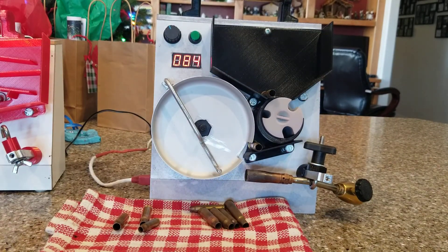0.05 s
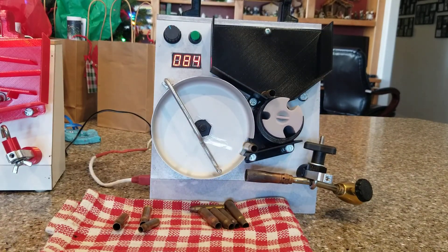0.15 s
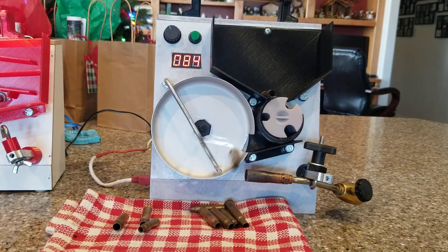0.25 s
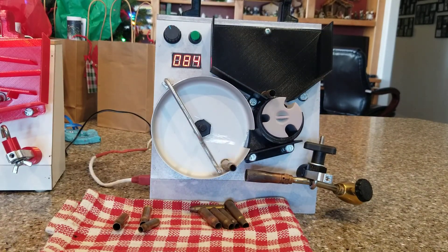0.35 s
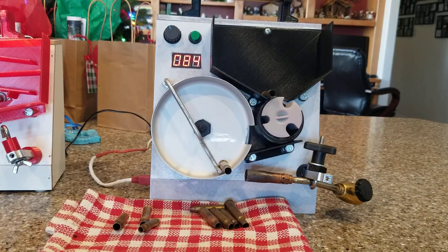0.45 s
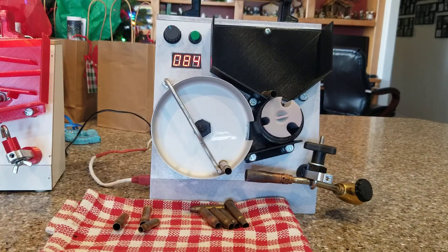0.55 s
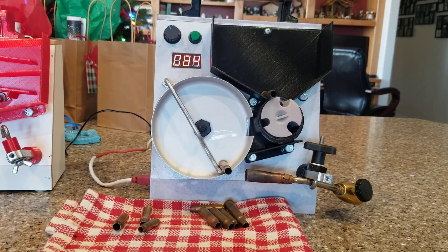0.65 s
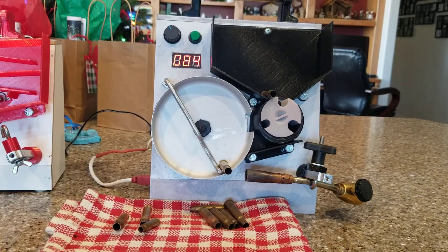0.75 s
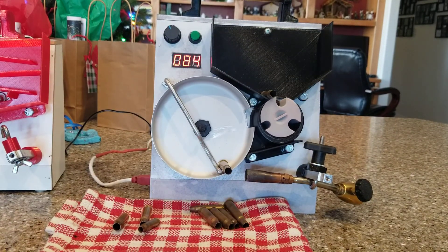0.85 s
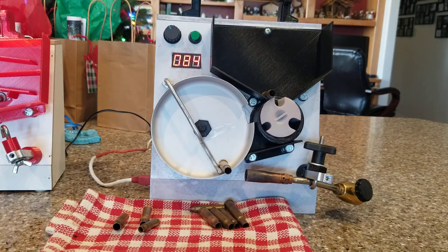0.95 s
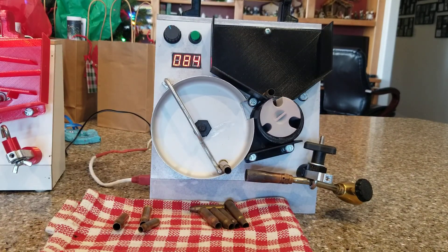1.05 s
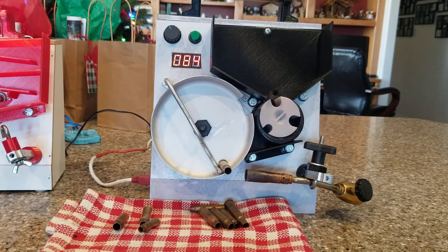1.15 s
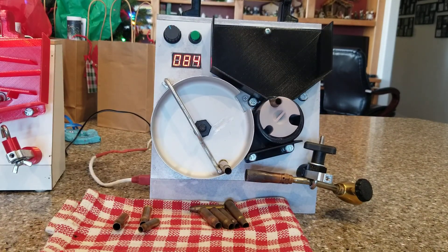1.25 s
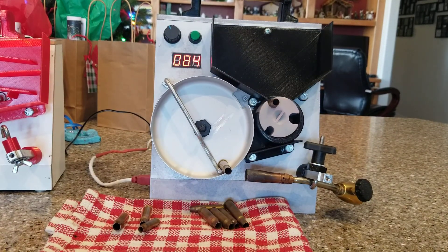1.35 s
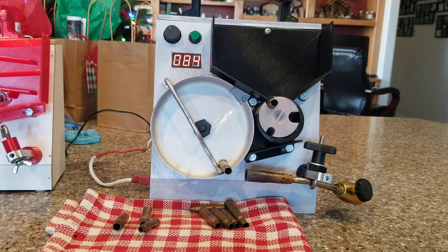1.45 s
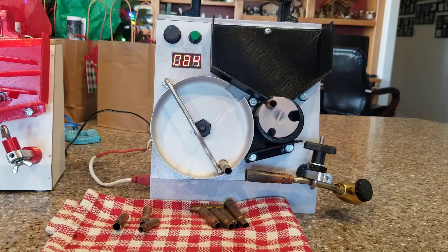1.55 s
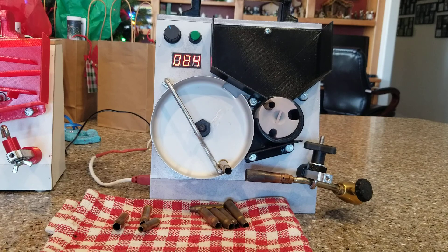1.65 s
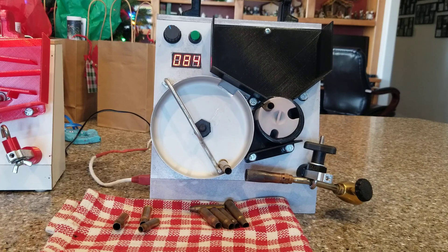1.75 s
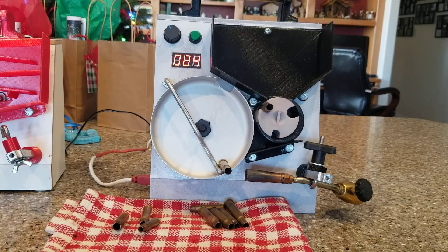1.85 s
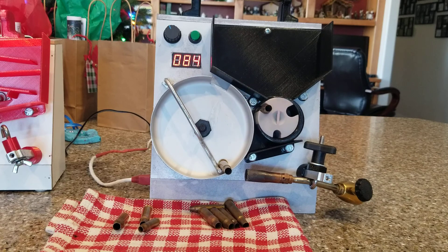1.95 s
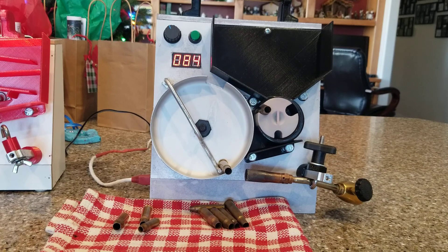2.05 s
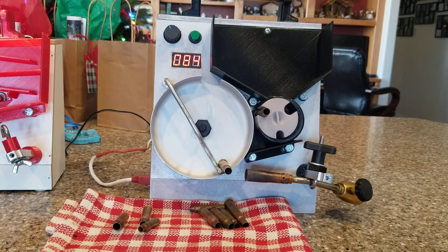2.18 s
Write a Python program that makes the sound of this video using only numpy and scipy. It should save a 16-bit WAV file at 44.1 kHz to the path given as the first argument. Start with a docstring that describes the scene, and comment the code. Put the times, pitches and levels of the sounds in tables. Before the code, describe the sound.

Thin brass tube tumbles into a sheet-metal pan in a dense burst of clacks and high ringing, then settles; a quieter hollow clink follows. Small motors hum steadily throughout, slightly right of centre, in a furnished room.

```python
"""Brass case dropping into a metal pan

In a living room, slightly right of the stereo microphones' centre, a small annealing machine hums on geared motors.
Its feed wheel lets a brass case go; the case clatters into the turning pan, rings and rolls to rest.
A second later the next case slips down the hopper into the wheel, with a tiny squeak.
Contacts are bursts of noise, ringing metal is decaying sine modes that waver with reflections,
and the motors are drifting bands of noise with a sine whine."""
import sys
import numpy as np
from scipy import signal
from scipy.fft import rfft, irfft
from scipy.io import wavfile

SR = 44100
rng = np.random.default_rng(int(sys.argv[2]) if len(sys.argv) > 2 else 0)


def generate_wav(signal):
    """Clip the signal to [-1, 1] and save it as 16-bit WAV at the path in sys.argv[1]."""
    frames = np.transpose(np.atleast_2d(signal))
    scaled = np.clip(frames, -1, 1) * 32767
    pcm = np.round(scaled).astype(np.int16)
    wavfile.write(sys.argv[1], SR, pcm)


N = 97020
TIME = np.arange(N) / SR  # seconds
BAND_EDGES_HZ = np.geomspace(25, 17000, 29)

# Microphones and room. T60 is the time to fall by 60 dB.
LEFT_LAG_SAMPLES = 5
CUTOFF_HZ = 15750
DIRECT_LIKENESS = 0.18  # left-right correlation of the direct sound
# How alike the room makes both channels. Each row: frequency in Hz, left-right correlation.
ROOM_LIKENESS = [(80, 0.97), (300, 0.48), (640, 0.67), (1400, 0.041), (4000, 0)]
# How long the room's tail lasts. Each row: frequency in Hz, T60 in seconds.
ROOM_T60 = [(100, 0.61), (500, 0.4), (2500, 0.34), (6000, 0.28), (14000, 0.28)]

# Broad motor noise. Each row: frequency in Hz, level in dB of the white noise before band-filtering.
MOTOR_NOISE = [(25, -65.5), (60, -45.5), (190, -52.5), (400, -50), (800, -54.5), (1500, -59.5),
               (2100, -47.5), (2600, -77), (3400, -69.5), (5000, -73.5), (7000, -82.5), (9500, -73.5),
               (12000, -70), (15500, -70.5)]
# Where the motor noise sits. Each row: frequency in Hz, left over right in dB.
MOTOR_PAN = [(60, 12), (500, -10.5), (1650, 10.5), (5000, -15), (15000, -2)]
# Weaker gear resonances. Each row: frequency in Hz, width in Hz, mean level in dB, left over right in dB.
GEAR_TONES = [(475, 49, -71.5, 7.5), (848, 37, -72.5, -18), (2984, 320, -75, -11), (4173, 30, -85, -15)]
# Gear whine before its drift. Each row: time in seconds, pitch in Hz, level in dB.
WHINE = [(0, 1177, -73.5), (1.0, 1215, -83), (1.75, 1231, -71), (2.2, 1240, -67)]
# The gears' lowest resonance swells and fades. Each row: time in seconds, level in dB.
GROWL = [(0, -70), (.85, -68.5), (.98, -58.5), (1.07, -64), (1.16, -53), (1.38, -70.5), (1.66, -69),
         (1.74, -58), (1.8, -65.5), (2.02, -57), (2.2, -74.5)]
GROWL_HZ, GROWL_WIDTH_HZ = 334.2, 32

# The feed wheel lets a case go or takes one up. Each row: start in seconds, level of each mode in dB.
KNOCKS = [(0.114, -49), (0.1388, -44), (0.153, -48.5), (1.158, -54)]
KNOCK_HZ, KNOCK_T60_S = (440, 530, 620, 750), .06

# Frequencies in Hz of the four level columns of the clacks.
CLACK_HZ = (600, 1800, 6000, 13000)
# A case hits the machine. Each row: start in seconds, then levels in dB at CLACK_HZ before colouring.
CLACKS = [(0.1996, -23, -21.5, -10.5, -29), (0.2088, -20, -23.5, -18.5, -23), (.248, -21, -24.5, -30, -35),
          (0.2641, -21.5, -10, -23.5, -20.5), (0.27, -15, -33.5, -37, -41),
          (0.278, -18.5, -23.5, -19, -23.5), (0.287, -19, -29.5, -24.5, -40), (0.294, -18, -18.5, -23, -25),
          (0.3072, -12.5, -23.5, -40.5, -34.5), (0.331, -18.5, -19.5, -32, -19),
          (0.353, -19.5, -20.5, -23, -15.5), (0.388, -18, -26.5, -44, -29),
          (0.4246, -19.5, -19.5, -28, -48), (0.446, -31.5, -30.5, -33.5, -28.5),
          (1.181, -24, -25.5, -31, -38.5), (1.199, -40, -23, -42, -45), (1.2253, -27, -25.5, -34, -36),
          (1.241, -36, -29, -69, -54)]
# Colour shared by all clacks. Each row: frequency in Hz, gain in dB.
CLACK_COLOUR = [(50, -28), (100, -2.5), (220, -23.5), (370, -3.5), (700, -7), (1100, -1), (2100, -1),
                (2600, -3.5), (3500, -1.5), (7000, -5), (9000, -1.5), (12000, 2.5), (16000, 1)]
# Where the clacks sit. Each row: frequency in Hz, left over right in dB.
CLACK_PAN = [(80, 3.5), (300, 0.5), (640, -3), (1400, -4.5), (3100, -9.5), (6000, -20.5), (14000, -22)]
CRACK_T60_S, SNAP_T60_S = 0.017, 0.0067
TAIL_DB, SNAP_DB = -12.5, -6  # relative to the crack
# The crowded high modes of sheet metal make its treble uneven; full depth from this frequency up.
METAL_RIPPLE_DB, METAL_FROM_HZ = 5, 6500
# Modes of pan and housing. Each row: frequency in Hz, level in dB relative to the low clack, T60 in seconds.
HOUSING = [(325, -27, 0.5), (352.1, -33.5, 0.47), (426.5, -29, 0.34), (530, -28.5, 0.14),
           (682.7, -27.5, 0.18), (722, -30.5, 0.43), (847.5, -32.5, 0.37), (1190, -39, 0.62),
           (1413, -32.5, 0.23), (2117, -27.5, 0.12)]

# Between bounces the case chatters on the metal in small uneven contacts.
CHATTER_START_S, CHATTER_END_S, CHATTER_PER_S = .278, .457, 170
CHATTER_DB, CHATTER_FALL_DB_PER_S, CHATTER_SPREAD_DB = -47.5, 61.5, 4.5
# Thin partials stirred by the chatter. Each row: frequency in Hz, level in dB relative to the contact.
CHATTER_MODES = [(4970, -9.5), (6870, -8.5), (7910, 0), (11130, 1), (11650, 2.5), (14280, -1), (14800, -2)]
CHATTER_T60_S, TICK_T60_S = .11, 0.0069
TICK_DB, RAP_DB = 9, 20  # relative to the contact, before band-filtering

# The first case rings as it tumbles, and once faintly as it shifts in the pan; each blow rouses different modes.
# Each row: start in seconds, levels in dB of low ring, ping, main ring and shimmer.
CLINKS = [(.288, -30, -30, -26.5, -52), (0.3103, -38.5, -24.5, -19, -42), (.333, -58.5, -42, -30.5, -30.5),
          (0.3533, -62, -44, -23.5, -34.5), (0.39, -40.5, -29.5, -26, -53), (0.42, -39, -30.5, -42, -50),
          (0.43, -36.5, -44.5, -29, -39), (1.124, -63, -79.5, -70.5, -82)]
# Mode pitches in Hz: one group for each of those four families.
CASE_HZ = ((2865, 2930, 3470, 3875, 4155), (8980, 9270), (10067, 10451, 10545, 10718, 13517),
           (8290, 11900, 14508))
# The same four groups of modes. Each row: level in dB relative to the family, T60 in seconds.
CASE = [
    [(-1.5, .298), (-1, 0.084), (-7, 0.29), (-14.5, .17), (-4, 0.29)],
    [(-2.5, .04), (-2.5, 0.069)],
    [(-14, .35), (0.5, 0.24), (-13, 0.14), (-14, 0.21), (-20.5, 0.28)],
    [(-1.5, .13), (-1, .12), (-3.5, 0.13)],
]

# The pan drones while the case rolls along its rim.
ROLL_START_S, ROLL_END_S, ROLL_ATTACK_S, ROLL_T60_S = 0.3006, 0.4, 0.063, 0.29
ROLL_HZ, ROLL_DB = 92.3, -37.5

HOPPER_PAN_DB = -10  # left over right
# The next case rings in the hopper. Each row: start in seconds, level in dB.
HOPPER_CLINKS = [(1.18, -51.5), (1.224, -48.5), (1.238, -48.5)]
# Modes of that case. Each row: frequency in Hz, level in dB relative to the clink, T60 in seconds.
HOPPER_CASE = [(2440, -5, 0.13), (2750, 2, .09), (8500, -1.5, 0.273), (11150, -2.5, 0.24),
               (14780, -22, 0.13)]
# The hopper booms under the case. Each row: start in seconds, level in dB.
HOPPER_BUMPS = [(1.186, -50), (1.201, -53.5), (1.244, -52.5)]
# Modes of the hopper's walls. Each row: frequency in Hz, level in dB relative to the bump, T60 in seconds.
HOPPER = [(80.55, -4.5, 0.54), (104.4, 0.5, 0.26), (188.7, -1.5, 0.254), (357.3, 13, 0.18)]

# Brass slips in the feed wheel. Each row: start in seconds, length in seconds, peak level in dB.
SQUEAKS = [(1.435, 0.0073, -47.5)]
SQUEAK_HZ, SQUEAK_FALL_HZ_PER_S = 13770, 430000


def from_db(db):
    """Decibels to gain."""
    return 10 ** (np.asarray(db) / 20)


def at_hz(points, hz):
    """Read a table on a log-frequency axis."""
    table_hz, values = np.transpose(points)
    return np.interp(np.log(hz), np.log(table_hz), values)


def pan(db):
    """Left and right gains, db apart, of unit mean power."""
    gains = from_db([[db / 2], [-db / 2]])
    return gains / np.sqrt(np.mean(gains ** 2))


def drift(rate_hz):
    """Slow chance with spread 1: low-passed noise, drawn every 40 samples and joined by lines."""
    pole = np.exp(-80 * np.pi * rate_hz / SR)
    noise = rng.standard_normal(N // 40 + 2002)
    slow = signal.lfilter([1], [1, -2 * pole, pole * pole], noise)[2000:]  # settled part
    return np.interp(np.arange(N) / 40, np.arange(len(slow)), slow / slow.std())


def stereo_noise(alike):
    """White noise with a given left-right correlation, mixed from mid and side."""
    alike = np.clip(alike, -1, 1)
    mid, side = rng.standard_normal((2, N))
    return np.sqrt((1 + alike) / 2) * mid + np.sqrt((1 - alike) / 2) * side * np.array([[1], [-1]])


def room_noise(hz):
    """White noise, as alike in both channels as the room makes it at this frequency."""
    return stereo_noise(at_hz(ROOM_LIKENESS, hz))


def band(x, low, high):
    """Causal band-pass between two frequencies in Hz."""
    return signal.sosfilt(signal.butter(2, [low, high], "band", fs=SR, output="sos"), x + 1e-18)


def dying(times, dbs, t60):
    """Envelope of something struck: each blow adds energy, which then dies away."""
    blows = np.zeros(N)
    np.add.at(blows, (np.asarray(times) * SR).astype(int), from_db(dbs) ** 2)
    keep = np.exp(-2 * np.log(1000) / (t60 * SR))
    return np.sqrt(signal.lfilter([1], [1, -keep], blows + 1e-18))


def ring(times, dbs, hz, t60, pan_db, waver, kick=0.45):
    """One decaying mode: blows add energy and nudge its phase; reflections make it waver in each channel."""
    nudges = np.cumsum(kick * rng.standard_normal(len(times) + 1))  # radians
    turn = rng.uniform(0, 2 * np.pi) + nudges[np.searchsorted(np.sort(times), TIME)]
    both, left, right = (drift(45) + 1j * drift(45) for _ in range(3))
    alike = np.clip(at_hz(ROOM_LIKENESS, hz), 0, 1)
    reflections = np.sqrt(alike) * both + np.sqrt(1 - alike) * np.array([left, right])
    paths = 1 + waver * reflections
    tone = np.real(paths * np.exp(1j * (2 * np.pi * hz * TIME + turn))) / np.sqrt(.5 + waver ** 2)
    return pan(pan_db) * dying(times, dbs, t60) * tone


def resonance(hz, width):
    """A resonance stirred by random gear contacts: narrow noise of rms 1."""
    tone = band(room_noise(hz), hz - width / 2, hz + width / 2)
    return tone / tone.std()


def motors(flutter_db=0.64, gear_flutter_db=3.5):
    """Gear noise with a low growl, a few uneven resonances and a slowly rising whine."""
    out = from_db(np.interp(TIME, *np.transpose(GROWL))) * resonance(GROWL_HZ, GROWL_WIDTH_HZ)
    for low, high in zip(BAND_EDGES_HZ, BAND_EDGES_HZ[1:]):
        hz = np.sqrt(low * high)
        level = from_db(at_hz(MOTOR_NOISE, hz) + flutter_db * drift(39))
        out = out + pan(at_hz(MOTOR_PAN, hz)) * level * band(room_noise(hz), low, high)
    for hz, width, db, side_db in GEAR_TONES:
        level = from_db(db + gear_flutter_db * drift(60.04))
        out = out + pan(side_db) * level * resonance(hz, width)
    s, hz, db = np.transpose(WHINE)
    pitch = np.interp(TIME, s, hz) + 9 * drift(29)
    phase = 2 * np.pi * np.cumsum(pitch) / SR
    level = from_db(np.interp(TIME, s, db) + gear_flutter_db * drift(83))
    return out + level * np.sqrt(2) * np.sin(phase)


def knocks():
    """Soft, quickly damped bumps in the feed wheel."""
    s, hit_db = np.transpose(KNOCKS)
    modes = sum(ring(s, hit_db, hz, KNOCK_T60_S, pan_db=-2.5, waver=0.54) for hz in KNOCK_HZ)
    return band(modes, 320, 750)


def clacks():
    """Hard contacts: snap, short crack and room tail in every band, coloured by the same sheet metal."""
    s, *levels = np.transpose(CLACKS)
    bins = np.fft.rfftfreq(N, 1 / SR)
    depth_db = METAL_RIPPLE_DB * np.minimum(bins / METAL_FROM_HZ, 1) ** 2
    # here the drift runs along frequency; the last term keeps the mean power
    ripple = from_db(depth_db * drift(45)[:len(bins)] - depth_db ** 2 * np.log(10) / 20)
    out = 0
    for low, high in zip(BAND_EDGES_HZ, BAND_EDGES_HZ[1:]):
        hz = np.sqrt(low * high)
        dbs = np.array([np.interp(np.log(hz), np.log(CLACK_HZ), row) for row in np.transpose(levels)])
        dbs = dbs + at_hz(CLACK_COLOUR, hz)
        sides = pan(at_hz(CLACK_PAN, hz))
        crack = sides * np.hypot(dying(s, dbs, CRACK_T60_S), dying(s, dbs + SNAP_DB, SNAP_T60_S))
        tail = sides * dying(s, dbs + TAIL_DB, at_hz(ROOM_T60, hz))
        near, far = irfft(rfft([stereo_noise(DIRECT_LIKENESS), room_noise(hz)]) * ripple, N)
        out = out + band(crack * near + tail * far, low, high)
    return out


def housing():
    """Sheet-metal modes of pan and housing, shaken by the low part of each clack."""
    s, low_db = np.transpose(CLACKS)[:2]
    modes = sum(ring(s, low_db + db, hz, t60, at_hz(CLACK_PAN, hz), waver=0.56) for hz, db, t60 in HOUSING)
    return band(modes, 200, 6300)


def chatter():
    """Tiny contacts of the tumbling case: each ticks, raps and stirs the partials, weaker as it settles."""
    s = np.arange(CHATTER_START_S, CHATTER_END_S, 1 / CHATTER_PER_S)
    jitter, force, *shares = rng.standard_normal((len(s), len(CHATTER_MODES) + 2)).T
    s = s + .5 * jitter / CHATTER_PER_S
    dbs = CHATTER_DB - CHATTER_FALL_DB_PER_S * (s - CHATTER_START_S)
    partials = 0
    for (hz, db), share in zip(CHATTER_MODES, shares):
        mode_dbs = dbs + db + CHATTER_SPREAD_DB * share
        partials = partials + ring(s, mode_dbs, hz, CHATTER_T60_S, at_hz(CLACK_PAN, hz), waver=0.22)
    hit_dbs = dbs + CHATTER_SPREAD_DB * force
    ticks = dying(s, hit_dbs + TICK_DB, TICK_T60_S) * stereo_noise(DIRECT_LIKENESS)
    # each contact also raps the pan in the middle range
    raps = dying(s, hit_dbs + RAP_DB, TICK_T60_S) * stereo_noise(DIRECT_LIKENESS)
    return partials + pan(db=-17) * band(ticks, 8000, CUTOFF_HZ) + pan(db=-5) * band(raps, 800, 2400)


def first_case():
    """A thin brass tube rings at each blow, its four families of modes struck unequally."""
    s, *family_dbs = np.transpose(CLINKS)
    out = 0
    for hit_db, pitches, modes in zip(family_dbs, CASE_HZ, CASE):
        for hz, (db, t60) in zip(pitches, modes):
            out = out + ring(s, hit_db + db, hz, t60, at_hz(CLACK_PAN, hz), waver=.3)
    return out


def roll():
    """The pan's lowest note, a sine, swells, holds and dies away."""
    swell = np.clip((TIME - ROLL_START_S) / ROLL_ATTACK_S, 0, 1)
    release = np.exp(-np.log(1000) * np.maximum(TIME - ROLL_END_S, 0) / ROLL_T60_S)
    tone = np.sqrt(2) * np.sin(2 * np.pi * ROLL_HZ * TIME)
    return pan(db=2.5) * from_db(ROLL_DB) * swell * release * tone


def hopper_case():
    """The next brass tube rings as it strikes the hopper."""
    s, hit_db = np.transpose(HOPPER_CLINKS)
    return sum(ring(s, hit_db + db, hz, t60, HOPPER_PAN_DB, waver=0.57) for hz, db, t60 in HOPPER_CASE)


def hopper():
    """Low, hollow decaying modes of the hopper's walls."""
    s, hit_db = np.transpose(HOPPER_BUMPS)
    modes = sum(ring(s, hit_db + db, hz, t60, at_hz(CLACK_PAN, hz), waver=0.64) for hz, db, t60 in HOPPER)
    return band(modes, 75, 610)


def squeaks():
    """Very short, dry slips of brass: a sine whose pitch drops at once."""
    out = 0
    for s, length, db in SQUEAKS:
        age = np.clip(TIME - s, 0, length)
        phase = 2 * np.pi * np.cumsum(SQUEAK_HZ - SQUEAK_FALL_HZ_PER_S * age) / SR
        out = out + from_db(db) * np.sin(np.pi * age / length) * np.sin(phase)
    return pan(HOPPER_PAN_DB) * out


def scene():
    """Everything heard at the machine; it reaches the left microphone a little later."""
    impacts = knocks() + clacks() + housing() + chatter()
    ringing = first_case() + roll() + hopper_case() + hopper()
    left, right = motors() + impacts + ringing + squeaks()
    return np.array([np.pad(left, (LEFT_LAG_SAMPLES, 0))[:N], right])


def record(dry):
    """The top is cut by a steep elliptic low-pass."""
    return signal.sosfilt(signal.ellip(10, .1, 80, CUTOFF_HZ, fs=SR, output="sos"), dry)


dry = scene()
out = record(dry)
generate_wav(out)
```